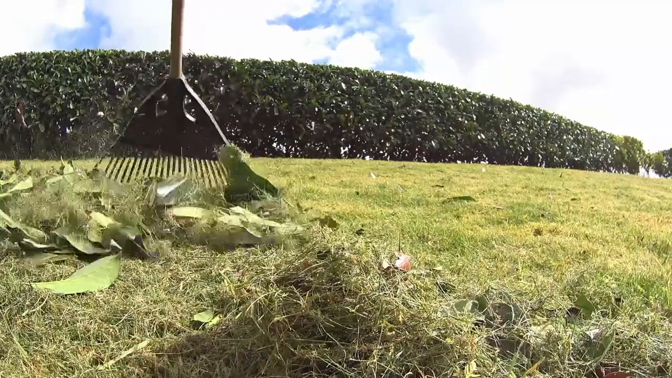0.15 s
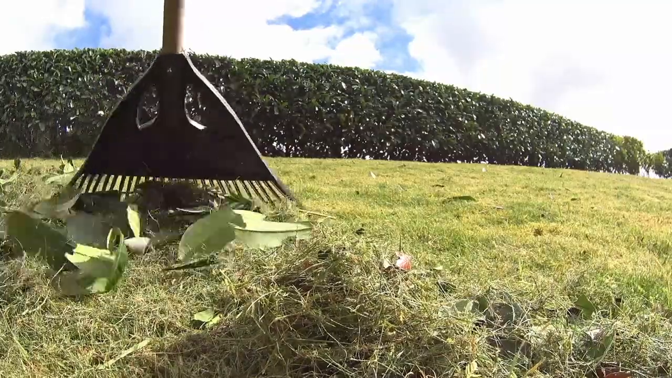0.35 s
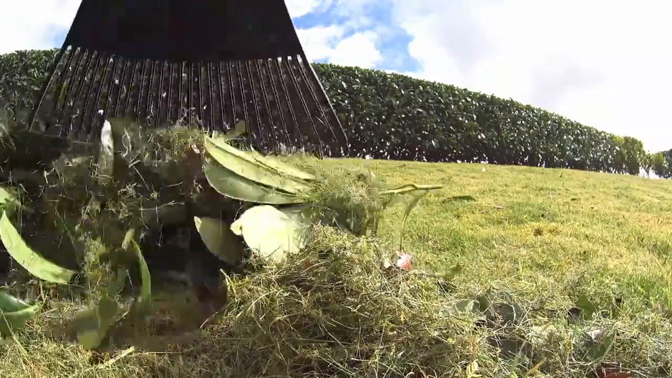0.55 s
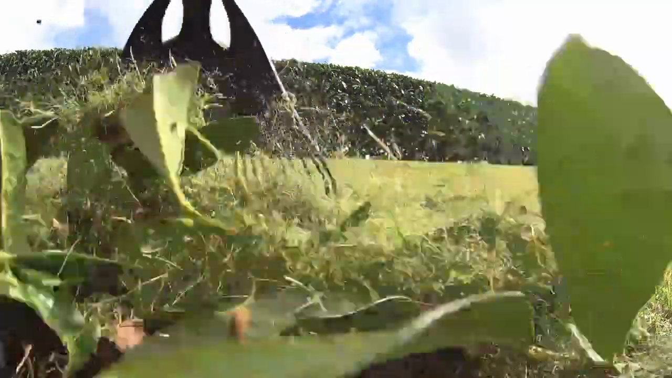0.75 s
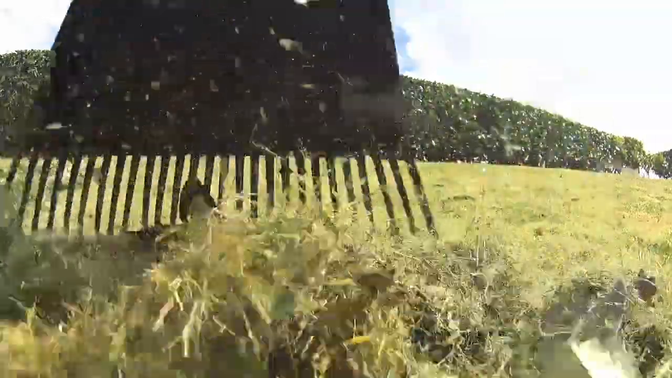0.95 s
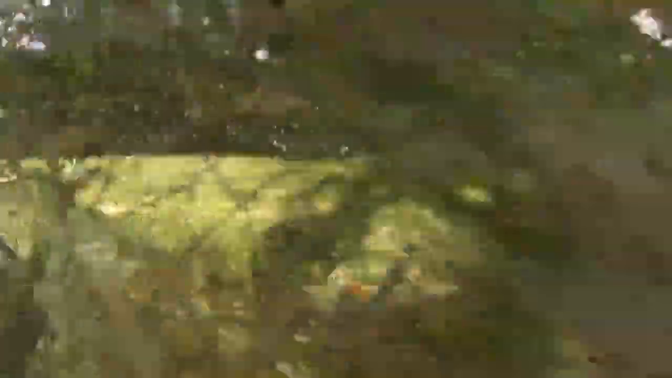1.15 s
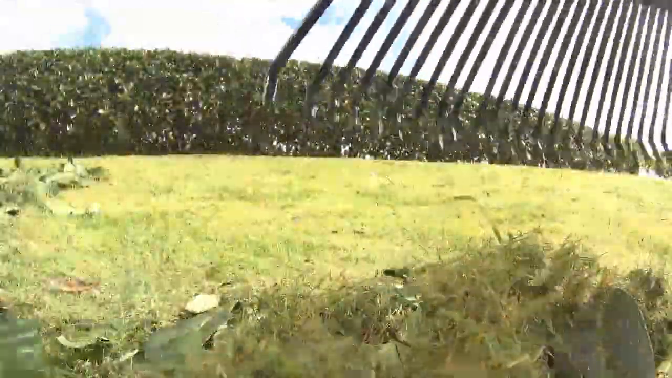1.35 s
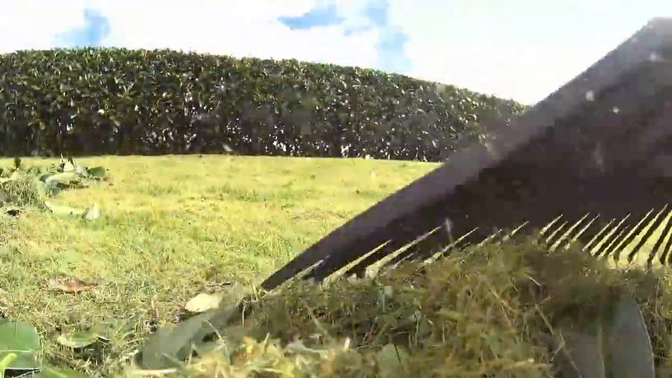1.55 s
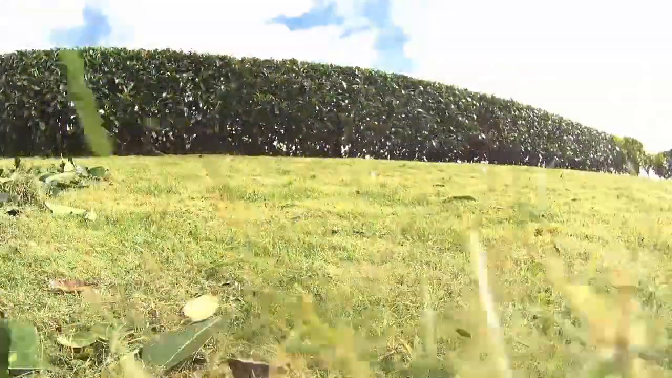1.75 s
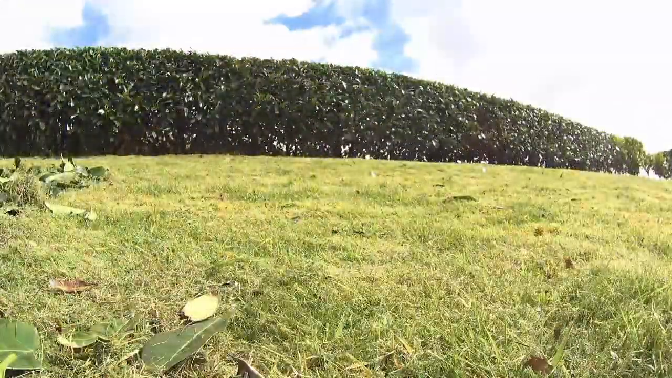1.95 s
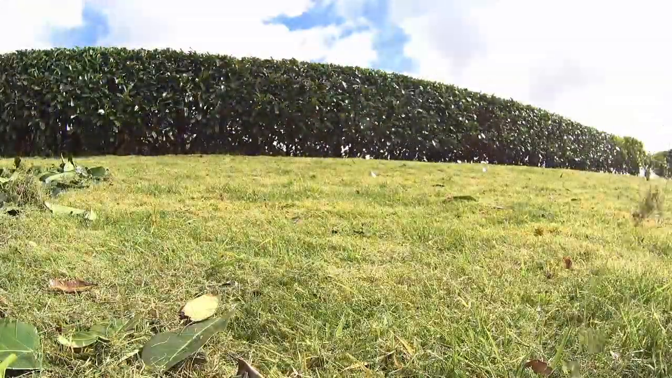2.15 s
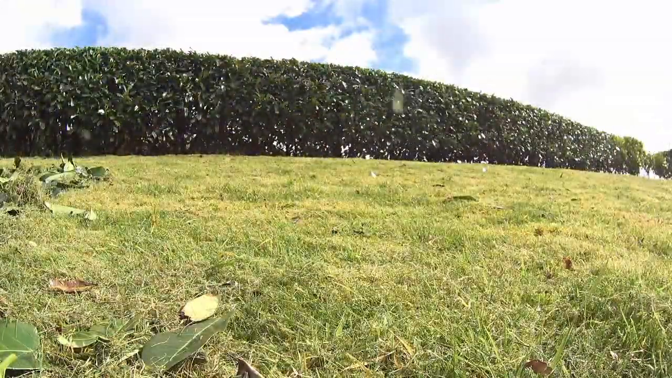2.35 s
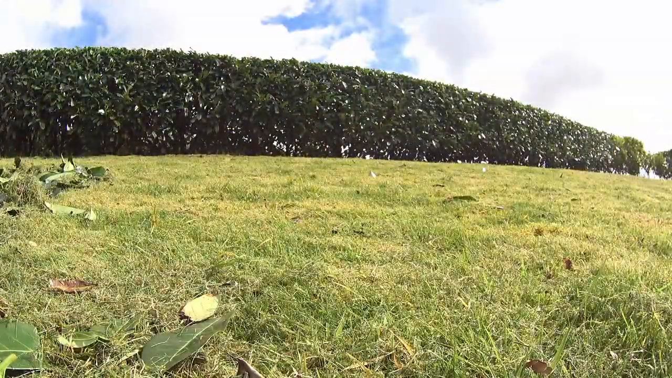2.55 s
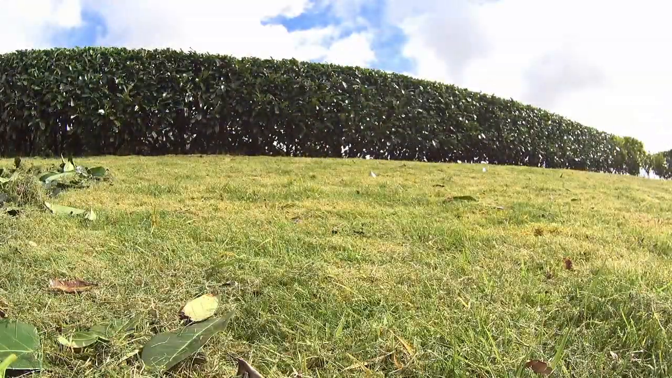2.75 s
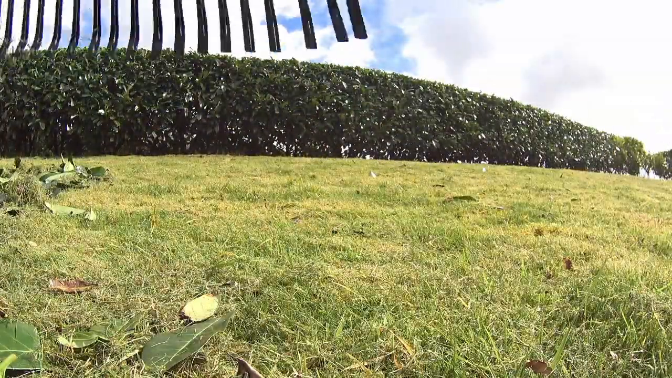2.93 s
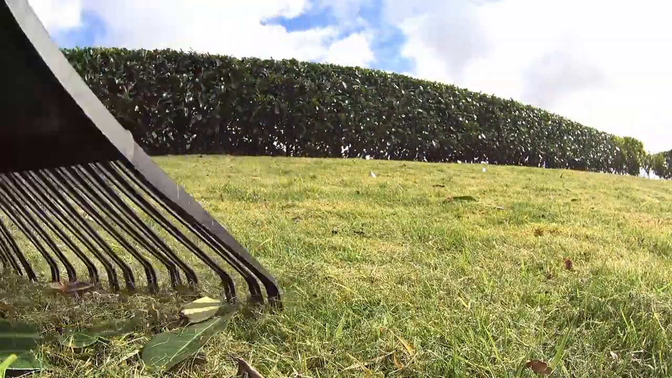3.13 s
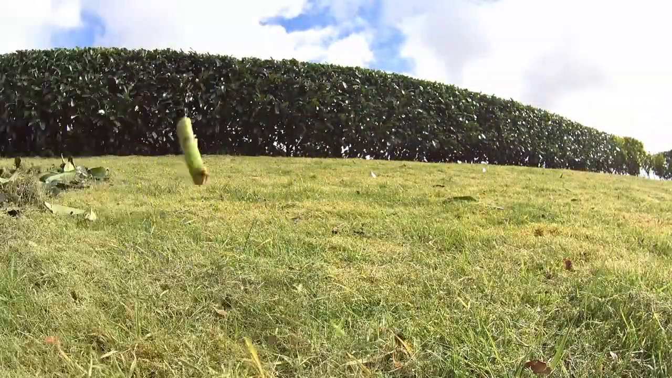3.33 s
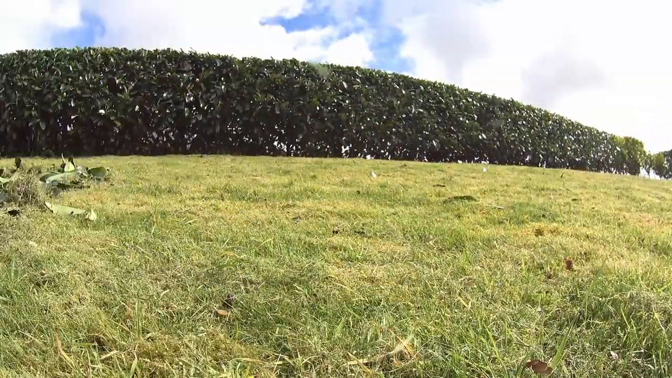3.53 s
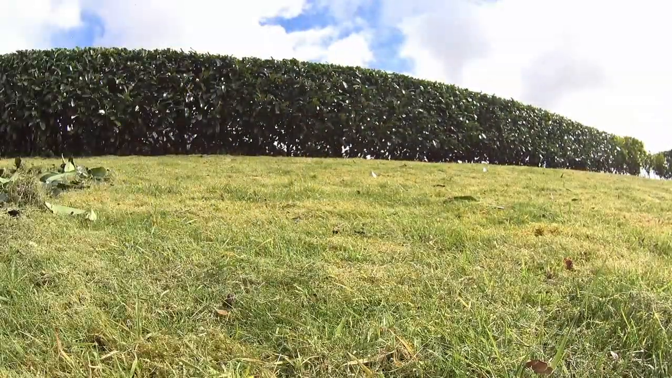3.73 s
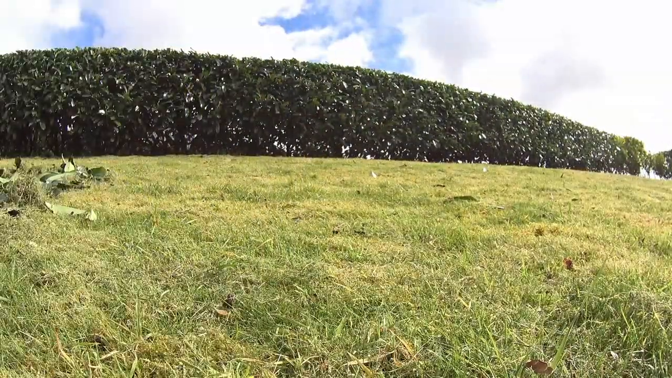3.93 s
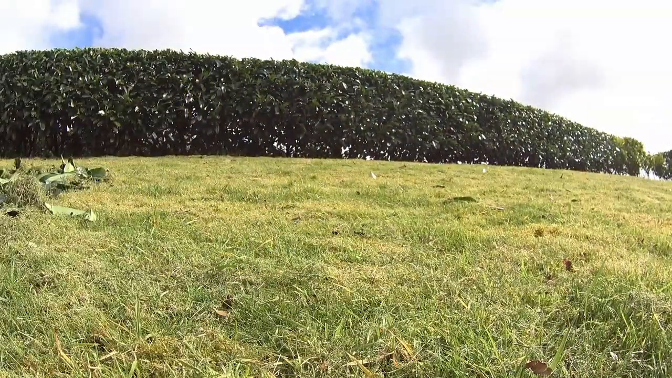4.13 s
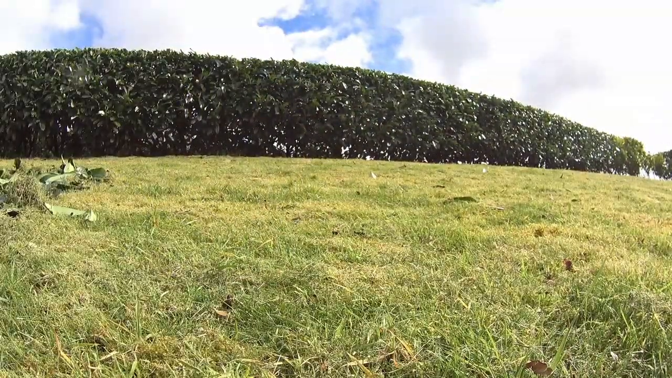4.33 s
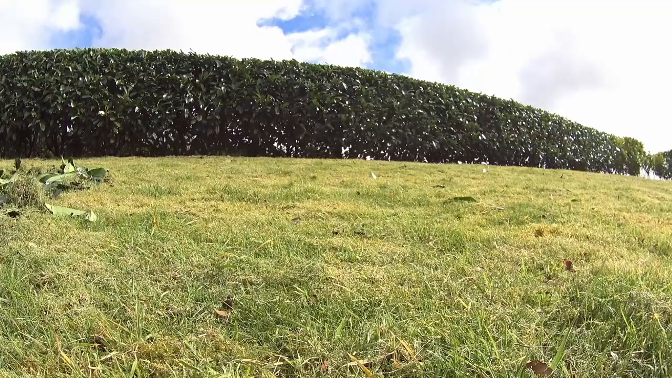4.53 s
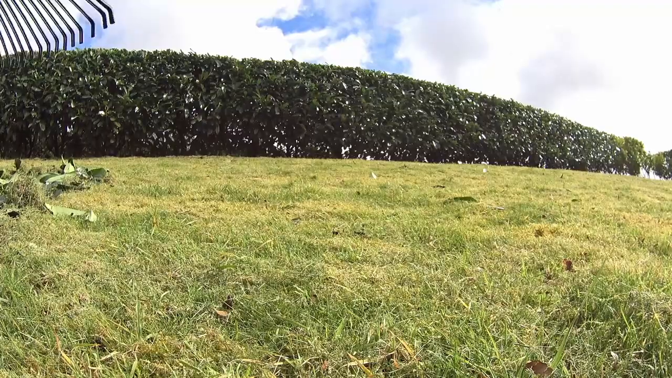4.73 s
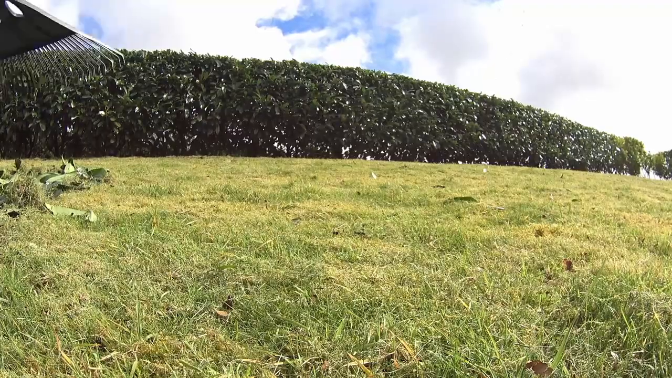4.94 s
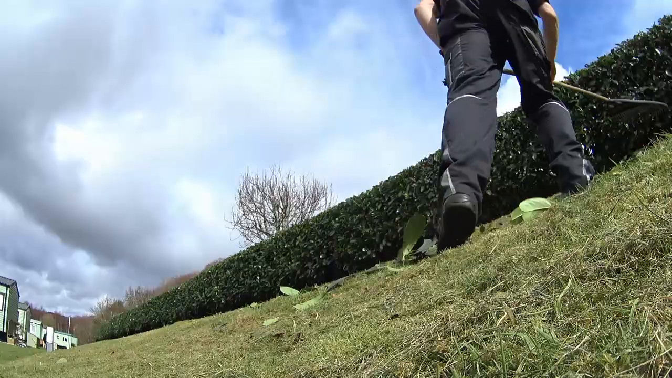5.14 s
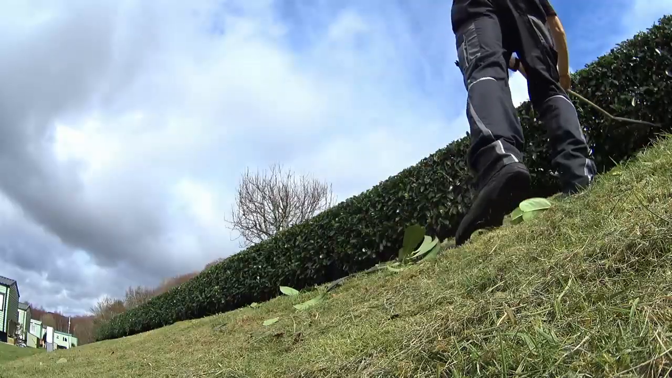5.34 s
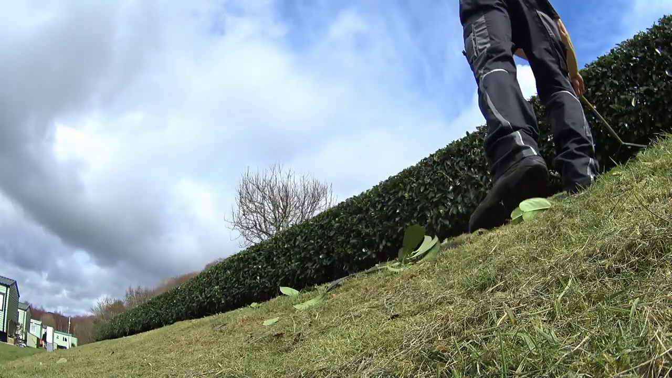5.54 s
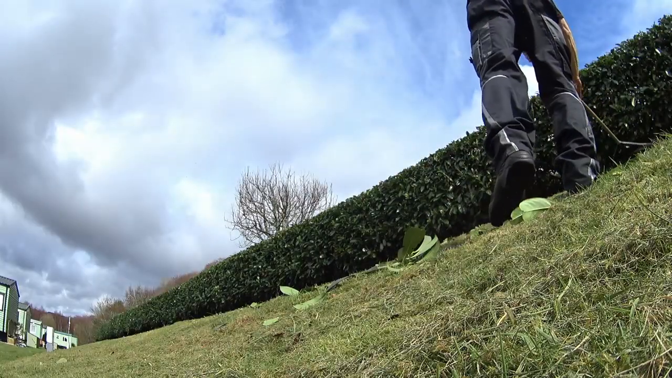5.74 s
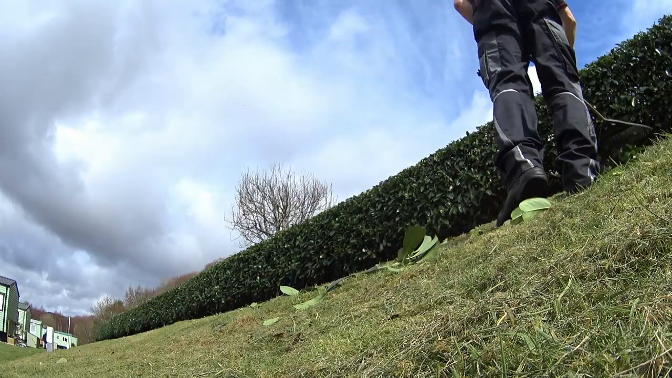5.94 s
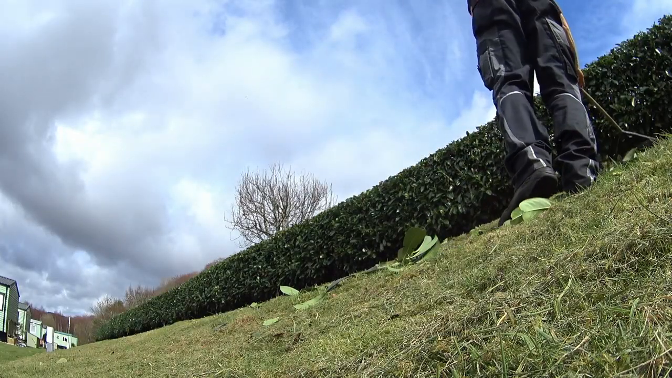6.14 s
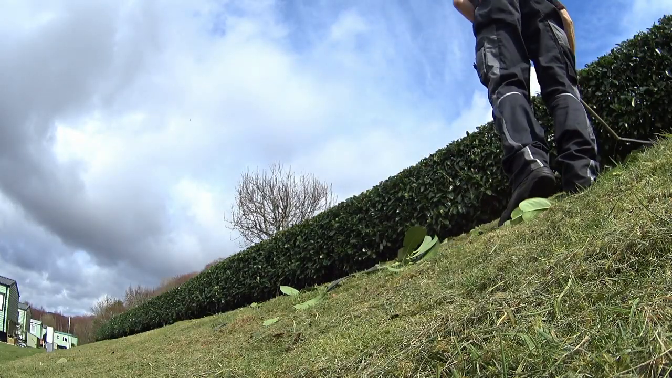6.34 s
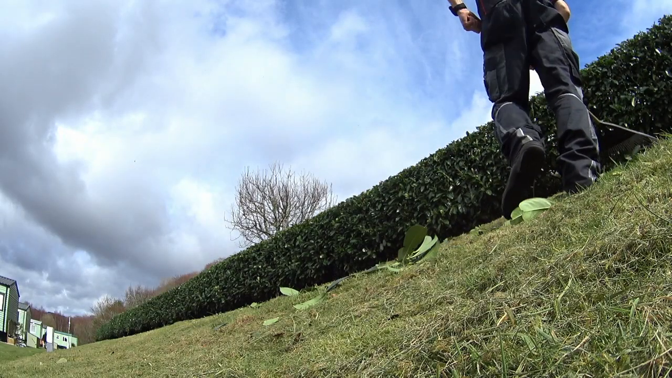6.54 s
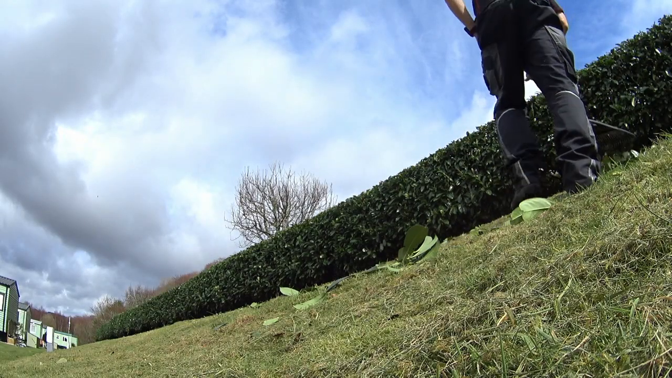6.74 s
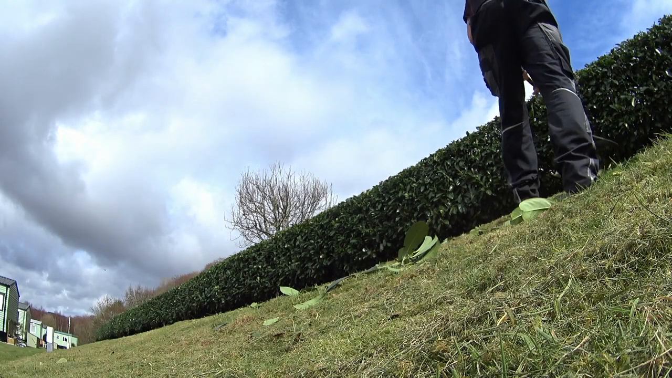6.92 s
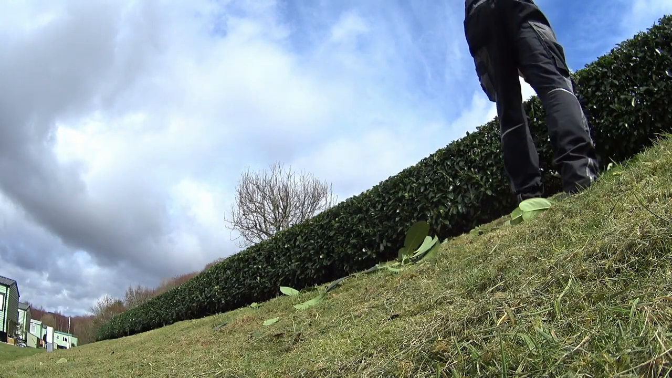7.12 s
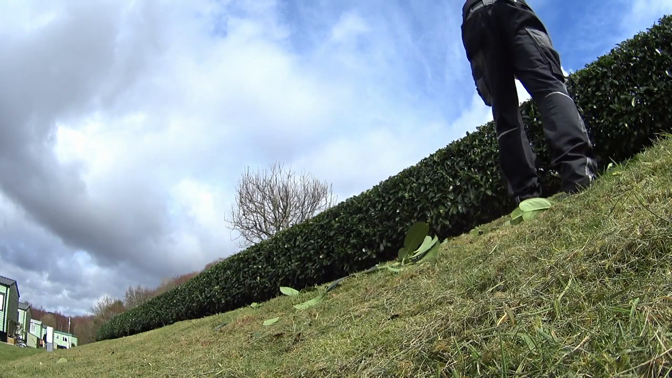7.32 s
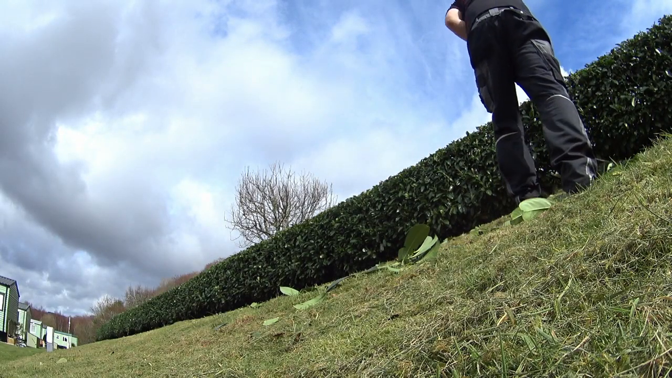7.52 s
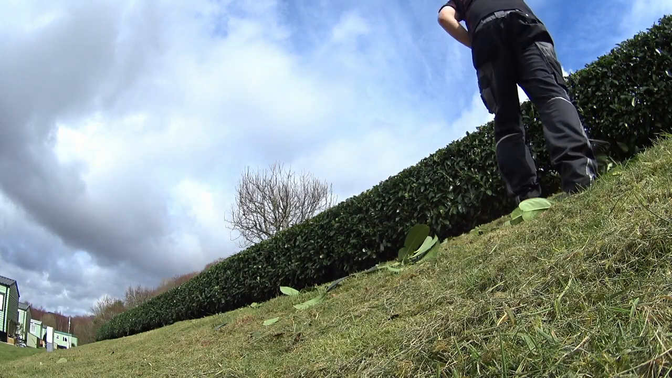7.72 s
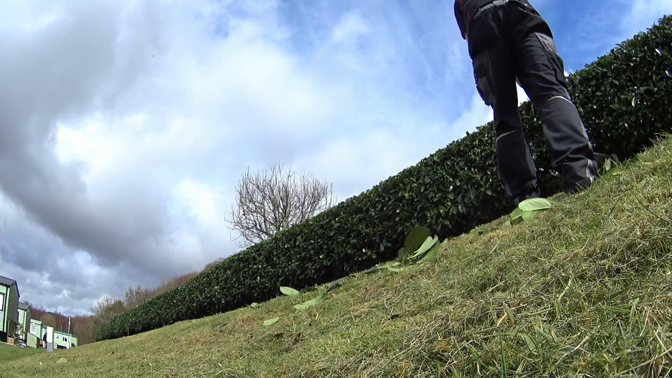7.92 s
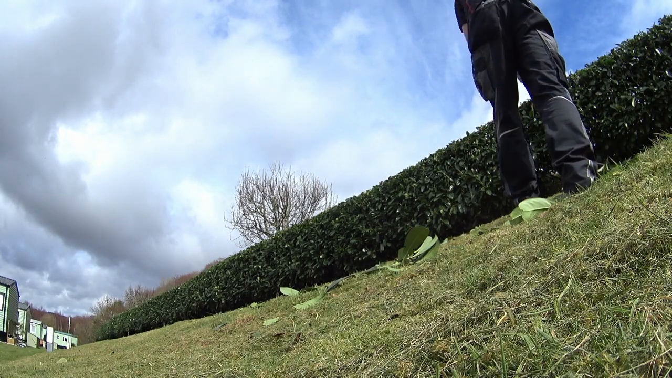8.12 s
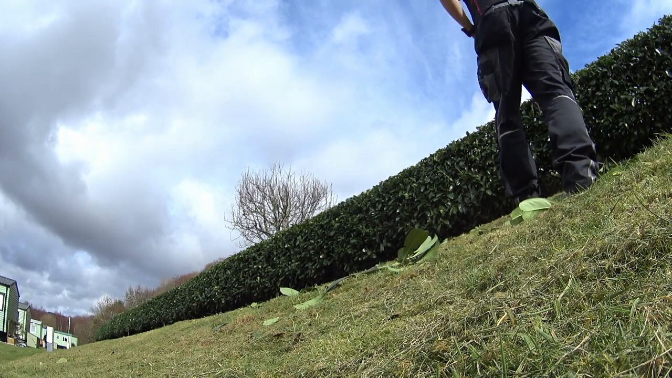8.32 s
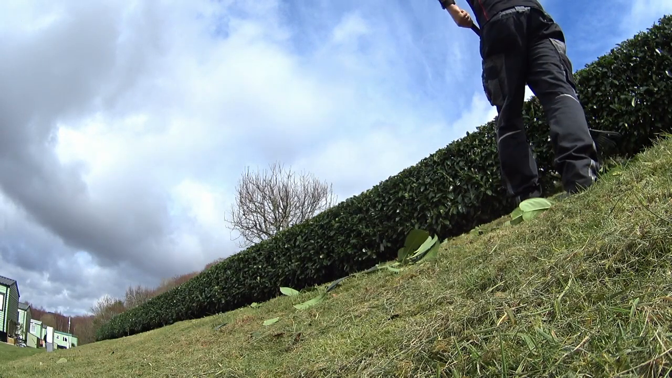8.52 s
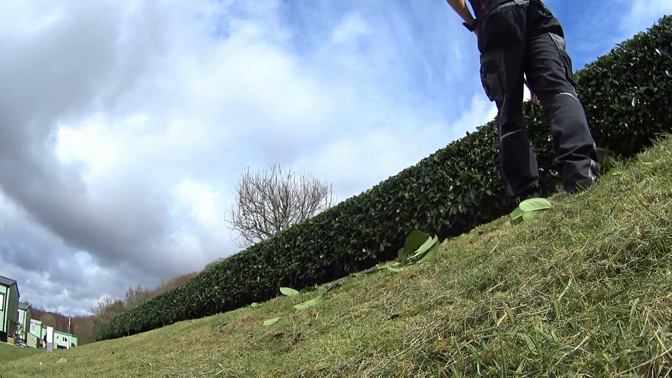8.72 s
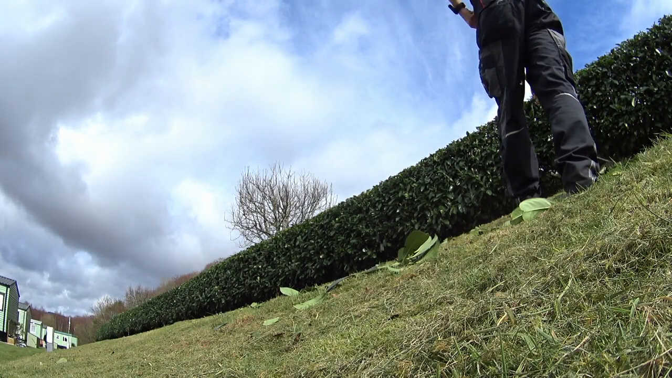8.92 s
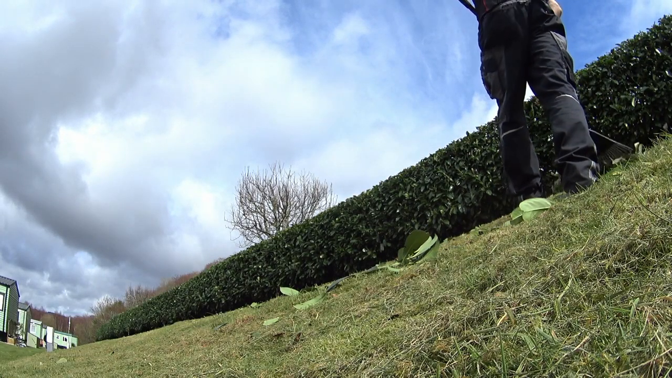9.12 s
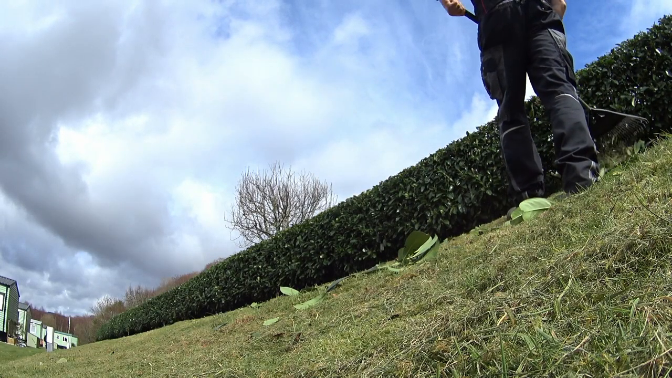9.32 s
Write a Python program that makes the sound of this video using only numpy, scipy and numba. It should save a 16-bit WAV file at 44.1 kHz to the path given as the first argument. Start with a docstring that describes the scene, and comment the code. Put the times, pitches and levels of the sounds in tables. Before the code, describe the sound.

A plastic rake works through hedge clippings beside a microphone on the lawn. From 0 s leaves rustle, swelling to crunchy strokes around 0.4-0.7 s while a bird buzzes twice. At 0.9-1.9 s strokes are loudest and dense, tines clattering, hollow knocks and thrown clippings drumming on the housing, with a hard blow near 1.2 s. A quieter gap from 2 s has light ticks, a small scrape at 2.3 s, a thin high bird note and buzzy calls near 3 s. Another violent sweep peaks at 3.3-3.5 s, one tine briefly ringing; a sharp overloaded knock follows at 4.07 s, then faint rustles. A weak low hum stops at 5.1 s as raking turns distant: soft swish-scrapes around 5.7, 6.4, 7.5, 8.3 and 9.1 s. Birds whistle until 6.3 s, then chip rapidly at 6.8-7.3 s with a diffuse outdoor tail. Passing hiss fades, gusts buffet near 7.8 s, over quiet outdoor hush.

```python
"""A rake drags through hedge clippings close by: clumped snaps and hiss rustle, ringing modes make the tines clatter
and knock, thrown clippings drum on the camera housing and filtered noise shakes the turf. Buzzing bird calls and a
thin high note, sliding sines, come over a wavering hum. Just past halfway the hum stops and the raking moves further
off, a soft swish and scrape with sparse knocks, under a passing hiss and gusts of wind. Birds whistle, then chip
quickly, with a tail from hedge and trees. Filtered noise lies beneath it all as a faint outdoor hush."""
import sys
import numpy as np
from scipy import signal
from scipy.fft import rfft, irfft
from scipy.io import wavfile
from scipy.ndimage import uniform_filter1d
from numba import njit

SR = 44100
rng = np.random.default_rng(int(sys.argv[2]) if len(sys.argv) > 2 else 0)


def pcm_store(signal):
    """Save signal as 16-bit PCM."""
    levels = np.round(np.clip(np.atleast_2d(signal), -1, 1) * 32767)
    wavfile.write(sys.argv[1], SR, levels.astype(np.int16).T)


N = 417627
MOVE_S = 5.14  # the near strokes end here and the raking is heard further off


# near strokes of the rake; levels before the trims in raking():
# (full strength at [s], rise [s], hold [s], fall [s], leaf rustle [dB], tine clatter [dB],
#  drumming on the housing [dB], turf rumble [dB], left minus right [dB])
STROKES = [(0.06, 0.33, 0.21, .08, -39.5, -57, -56.5, -75, 1),
           (0.28, .05, 0.128, .05, -36.5, -59, -42, -63, 1.5),
           (0.425, 0.033, .1, 0.11, -26.5, -43, -32.5, -50, 1.5),
           (0.58, 0.18, .13, 0.13, -36, -45, -48.5, -60, 1.5),
           (0.73, 0.055, 0.2, 0.12, -32.5, -41, -48.5, -63, 0.5),
           (0.94, 0.063, 0.086, 0.061, -27, -21, -27.5, -32, 2),
           (1.063, 0.06, 0.053, .05, -24, -25.5, -29, -40, 1),
           (1.13, .03, 0.074, 0.011, -30, -32, -38, -41, 0.5),
           (1.3, 0.091, 0.12, 0.021, -39.5, -27, -32.5, -45, 1.5),
           (1.42, .02, 0.16, 0.046, -42.5, -36, -38, -44.5, 0.5),
           (1.62, 0.027, 0.13, 0.061, -28.5, -31, -35.5, -51, -1.5),
           (1.73, 0.047, 0.05, 0.14, -20.5, -18, -25.5, -35, -1.5),
           (1.92, 0.064, 0.0085, 0.28, -37.5, -42, -50, -67, -2),
           (2.27, 0.034, 0.044, .05, -38, -46.5, -46, -50, -9),
           (2.34, .07, 0.035, 0.15, -31.5, -37, -38, -43, -9),
           (2.85, .3, .01, 0.22, -48.5, -49.5, -58, -66, -3.5),
           (3.168, 0.0046, 0.071, .05, -37, -44, -44.5, -53, 2),
           (3.24, .04, 0.083, .05, -27.5, -35.5, -38.5, -44.5, 5.5),
           (3.31, 0.086, 0.07, 0.033, -19.5, -23, -32, -55, 2),
           (3.405, 0.037, 0.018, 0.02, -30, -18, -22.5, -31, 2.5),
           (3.44, 0.034, 0.053, 0.014, -41.5, -37.5, -38.5, -29, 1),
           (3.6, 0.059, 0.16, 0.3, -54.5, -49, -60, -70, 0),
           (3.98, 0.044, 0.033, .03, -38, -45, -52, -58, 6),
           (4.03, 0.056, 0.029, 0.0078, -33, -40, -35.5, -51, 5.5),
           (4.08, 0.017, 0.0082, 0.03, -56, -24.5, -22, -29, 2),
           (4.121, 0.025, 0.034, 0.098, -44.5, -38, -34, -36.5, 2),
           (4.25, 0.081, 0.27, 0.033, -57.5, -54.5, -66, -70, 7.5),
           (4.67, 0.0088, 0.012, 0.016, -48.5, -48, -55, -63, -0.5),
           (4.84, 0.21, 0.014, 0.17, -43.5, -46, -49, -62, 9),
           (4.98, .05, .1, 0.14, -61, -58.5, -59, -62, 6.5)]


def raking():
    """Each near stroke swells four layers: leaves, tines, thrown clippings and shaken turf."""
    leaf, tine, thrown, shake = swells(*np.transpose(STROKES)[:-1])
    leaves = leaf * rustle(count=30000, spread_db=4.5, snap_db=1.5, clump_db=3.5)
    tines = tine * tine_clatter()
    drum = thrown * undb(3.5) * drumming()
    turf = shake * rumble()
    moving = (leaves + tines) * sides(side_of(np.arange(N) / SR))
    return (moving + drum + turf) * (np.arange(N) < MOVE_S * SR)


def side_of(s):
    """Where the rake is at times s, as left minus right dB, sliding from stroke to stroke."""
    strokes = np.array(STROKES)
    return np.interp(s, strokes[:, 0], strokes[:, -1])


# colour of leaf and stalk: (frequency [Hz], relative density [dB per Hz])
LEAF_COLOUR = [(710, -9), (1200, -8), (1750, -7), (2610, -4), (2840, -2.5), (3560, -3), (4680, -2),
               (7100, -10.5), (8740, -10.5), (11100, -14), (11500, -48.5), (15000, -59.5), (22000, -120)]


def rustle(count, spread_db, snap_db, clump_db):
    """Thousands of tiny snaps of leaf and stalk, coming in clumps, over the hiss of grass through the tines."""
    when, loud, sign, place = rng.random((count, 4)).T
    size = undb(np.minimum(-spread_db * np.log(loud), 15)) * np.sign(sign - .5)
    aside = place - .5
    snaps = np.zeros((2, N))
    np.add.at(snaps, (slice(None), (when * N).astype(int)), size * np.array([1 + aside, 1 - aside]))
    clumped = level(snaps * undb(clump_db * walk(60)), snap_db)
    hiss = undb(1.3 * walk(20)) * wide(0.61)
    return level(colour(clumped + level(hiss, 0), LEAF_COLOUR), 0)


# ringing modes of the plastic tines: (pitch [Hz], relative level [dB], t60 before damping [s])
TINE_MODES = [(933, 4, 0.033), (1275, -2, 0.055), (1690, -0.5, .03), (2252, -5.5, 0.029),
              (3170, -15, 0.068)]


def tine_clatter():
    """Many small blows ring the tine modes, with a restless level."""
    blows = clatter(TINE_MODES, count=9000, spread_db=2.5, detune=0.093, damp=0.63, scatter=1.0)
    return undb(2.84 * walk(50)) * blows


# ringing modes of the camera housing: (pitch [Hz], relative level [dB], t60 before damping [s])
HOUSING_MODES = [(228, -10.5, 0.071), (280.3, 0, 0.06), (421, 3.5, 0.032), (540, -6, 0.051),
                 (687, -2.5, 0.046)]


def drumming():
    """Thrown clippings strike the housing and ring its low modes."""
    return clatter(HOUSING_MODES, count=4000, spread_db=3.0, detune=0.16, damp=0.79, scatter=1.0)


def rumble():
    """Low shaking of the turf, noise nearly alike left and right."""
    shake = undb(2.9 * walk(16)) * wide(0.34)
    return level(colour(shake, [(15, -62), (40, -17), (70, -10.5), (105, 9.5), (150, -8), (260, -50.0)]), 0)


# single knocks and snaps; levels before the trims in knocks():
# (time [s], peak [dB], main pitch [Hz], crack [dB], housing thud [dB])
KNOCKS = [(0.417, -20.5, 2800, -14.5, -38), (0.442, -21, 3860, -22, -43), (0.471, -16, 3850, -27, -28.5),
          (0.534, -10, 1220, -16, -31), (0.946, -13, 1290, -24, -26), (1.002, -10, 1290, -39, -21),
          (1.064, -17, 1250, -15.5, -25.5), (1.156, -27, 914, -28, -37), (1.209, -4.5, 3000, -21, -41),
          (1.216, -1.5, 1010, -31, -11), (1.255, -14, 1440, -34, -35), (1.307, -16, 1260, -25, -31),
          (1.344, -10, 1340, -28, -28), (1.345, -12.5, 3320, -35, -40), (1.391, -15, 1010, -19, -25),
          (1.399, -10, 1000, -20.5, -31), (1.534, -26, 974, -54, -35), (1.603, -13.5, 1270, -47, -27),
          (1.86, -18.5, 1280, -45, -33), (2.308, -38, 3040, -20, -45), (2.354, -17, 3550, -18.5, -36.5),
          (2.429, -22, 1440, -32, -36.5), (2.923, -36, 910, -49, -46), (2.992, -32, 940, -62.5, -45),
          (3.179, -30, 1060, -28, -49), (3.226, -20.5, 1250, -23, -48), (3.259, -15, 1510, -15, -44),
          (3.272, -21, 1490, -24, -51), (3.363, -17, 945, -41, -41), (3.408, -11, 1700, -36, -25),
          (3.424, -14, 910, -43, -19.5), (3.436, -21, 600, -48, -22), (3.465, -20, 945, -46, -47),
          (3.497, -11.5, 1090, -38, -31), (3.501, -4.5, 2680, -34, -30), (3.51, -0.5, 720, -18, -15.5),
          (3.611, -29, 1270, -24, -60), (3.82, -14, 906, -39, -21.5), (3.887, -40, 920, -52, -47),
          (4.065, 4.5, 786, -20.5, -16), (4.084, -6, 970, -37, -16), (4.093, -9, 805, -34, -18.5),
          (4.117, -18, 595, -32, -31), (4.284, -26.5, 630, -33.5, -59), (4.477, -34.5, 1330, -39.5, -61),
          (4.666, -27.5, 2580, -39.5, -48.5), (4.816, -37, 2470, -29.5, -59), (6.58, -54, 1180, -46, -49.5),
          (7.653, -42, 1140, -43.5, -61), (8.515, -35, 2000, -39, -57), (9.199, -33.5, 1700, -34, -56)]
HARD_DB, CHOKE_PER_DB = -12.5, 0.1  # each dB of peak above HARD_DB shortens the ring by this share


def knocks():
    """Each blow rings a short tone of its own and the tine modes near it, thuds the housing and cracks."""
    s, peak_db, hz, crack_db, thud_db = np.transpose(KNOCKS)
    long = np.maximum(1 - CHOKE_PER_DB * np.maximum(peak_db - HARD_DB, 0), .3)
    pan_db = np.where(s < MOVE_S, side_of(s), -4)
    soft = np.clip((peak_db - crack_db) / 25, .15, 1.2)  # a blow with little crack has a longer contact

    def vary():
        return rng.standard_normal(len(s))

    out = strike(s, hz, 0.022 * long, undb(peak_db - 0.5), pan_db, .5 * vary(), 0.14 * soft)
    out += cracks(s, crack_db + 5.5, pan_db)
    for mode_hz, db, t60 in TINE_MODES:
        near_db = db - 7.0 - 6 * np.abs(np.log2(mode_hz / hz))  # 6 dB weaker per octave from the main pitch
        tuned_hz = mode_hz * (1 + 0.026 * vary())
        out += strike(s, tuned_hz, t60 * long, undb(peak_db + near_db), pan_db, 1.84 * vary(), 0.6 * soft)
    for mode_hz, db, t60 in HOUSING_MODES:
        tuned_hz = mode_hz * (1 + 0.042 * vary())
        out += strike(s, tuned_hz, t60 * long, undb(thud_db + db + 5), pan_db, 1.66 * vary(), 0.36 * soft)
    return out


# the tine that keeps singing: (time [s], pitch [Hz], level [dB], t60 [s])
AFTER_RING = (3.514, 1980, -38, .12)


def after_ring():
    """One tine keeps singing, a single mode that decays slowly."""
    s, hz, db, t60 = np.array(AFTER_RING)[:, None]
    return strike(s, hz, t60, undb(db), 0 * s, 0 * s, 3.0)


# loose stalks and twigs dropping; level before the trims in ticks(): (time [s], peak [dB], pitch [Hz])
TICKS = [(2.081, -26.5, 1050), (2.1, -27, 7090), (2.149, -30, 8020), (2.202, -35, 903), (2.337, -17, 5000),
         (2.484, -25, 3600), (2.509, -35, 710), (2.548, -30, 7470), (2.733, -31.5, 2030), (2.84, -29, 820),
         (3.082, -40, 875), (3.603, -26, 1260), (3.656, -30, 1350), (3.701, -34, 1380), (4.138, -23, 920),
         (4.214, -26, 1280), (4.391, -35, 2130), (4.619, -30, 1000), (4.632, -39, 953), (1.292, -17, 3370),
         (0.473, -15, 6500), (1.017, -21, 8000), (1.08, -15, 6000), (2.002, -30, 902), (8.558, -33, 4000),
         (8.135, -46, 4500), (6.44, -42, 4000)]


def ticks():
    """A light click and a brief tone for each dropping stalk."""
    s, peak_db, hz = np.transpose(TICKS)
    tone = strike(s, hz, 0.017 + 0 * s, undb(peak_db - 9.5), 0 * s, 0 * s, 0.24)
    return tone + cracks(s, peak_db - 8.5, 0 * s)


# colour of the snap of a hard contact: (frequency [Hz], relative density [dB per Hz])
CRACK_COLOUR = [(900, -13), (2000, 0.5), (3200, 3.5), (5000, 0), (7200, -11), (11000, -15)]


def cracks(s, db, pan_db):
    """Short wide snaps: a click with a few milliseconds of splintering noise."""
    t = np.arange(300) / SR
    out = np.zeros((2, N))
    for at, gains in zip((s * SR).astype(int), (undb(db) * sides(pan_db)).T):
        splinter = rng.standard_normal(len(t)) * undb(-60 * t / 0.013)
        out[:, at:at + len(t)] += gains[:, None] * (splinter + 3.4 * (t == 0))
    return colour(out, CRACK_COLOUR)


# strokes further along the hedge; rustle before the trim in far_raking():
# (full strength at [s], rise [s], hold [s], fall [s], leaf rustle [dB], scrape [dB])
FAR_STROKES = [(5.16, 0.059, 0.45, 0.22, -62.5, -61), (5.72, .06, 0.17, .3, -58, -54.5),
               (6.38, 0.28, 0.24, .15, -57.5, -52.5), (6.747, .2, 0.29, 0.22, -69.5, -71),
               (7.237, 0.07, 0.035, .05, -66.5, -58), (7.472, .2, 0.091, 0.31, -56, -54),
               (8.137, 0.066, 0.061, .1, -64.5, -61), (8.287, .1, 0.24, 0.18, -58, -53),
               (9.055, 0.14, 0.093, 0.23, -53.5, -49)]


def far_raking():
    """Raking further off, its grains merged to a soft swish and a low noise scrape."""
    leaf, drag = swells(*np.transpose(FAR_STROKES))
    swish = rustle(count=30000, spread_db=3.5, snap_db=-2.5, clump_db=4.0) * sides(-3.5)[:, None]
    scrape = undb(2.7 * walk(25)) * wide(0.39)
    scrape = colour(scrape, [(80, -37), (200, -6), (340, 1.5), (520, -4), (900, -37.0)])
    return (leaf * undb(3.0) * swish + drag * level(scrape, 0)) * (np.arange(N) >= MOVE_S * SR)


def birds():
    """Buzzing calls, a thin high note and whistles to the left; quick chips from further away."""
    return garden(buzzes() + seep() + whistles(), -12) + garden(chips(), 1.5)


# buzzing calls; level before fade and pan:
# (start [s], length [s], first pitch [Hz], settled pitch [Hz], glide [s], level [dB])
BUZZES = [(0.04, 0.077, 3850, 3990, 0.034, -38), (0.234, 0.072, 3710, 3900, .02, -37),
          (2.747, 0.08, 3600, 3950, 0.0228, -44), (2.94, 0.078, 3500, 3880, 0.021, -46),
          (3.018, .04, 3680, 3800, .03, -56)]


def buzzes():
    """A fast deep wobble of pitch turns each note into a buzz."""
    return sum(note(row, attack_s=0.02, fade_db=5., trill_hz=225., depth_hz=200., pan_db=13.) for row in BUZZES)


# thin high note; level before fade and pan:
# (start [s], length [s], first pitch [Hz], settled pitch [Hz], glide [s], level [dB])
SEEP = [(2.49, 0.1455, 7300, 7700, .09, -54)]


def seep():
    """A high note that rises in pitch, wobbles fast and comes in slowly."""
    return sum(note(row, attack_s=0.052, fade_db=10.2, trill_hz=247.2, depth_hz=150., pan_db=12.) for row in SEEP)


# whistles; level before fade and pan:
# (start [s], length [s], first pitch [Hz], settled pitch [Hz], glide [s], level [dB])
WHISTLES = [(5.14, 0.038, 4070, 3900, .011, -42), (5.38, 0.069, 4180, 4060, 0.018, -48),
            (5.535, 0.053, 4140, 4050, 0.022, -41.5), (5.585, 0.053, 4040, 4140, 0.034, -42.5),
            (5.675, 0.088, 3570, 3540, 0.043, -42), (5.815, 0.033, 3740, 3730, .012, -38.5),
            (5.885, 0.141, 3780, 3750, 0.084, -46.5), (6.07, .215, 3590, 3730, 0.12, -62),
            (6.1, .06, 4260, 4340, .03, -70), (6.165, .135, 4420, 4200, 0.13, -65)]


def whistles():
    """Nearly pure notes with a shallow wobble of pitch."""
    return sum(note(row, attack_s=0.0135, fade_db=3.2, trill_hz=43.5, depth_hz=24., pan_db=6.7) for row in WHISTLES)


# quick chips; level before fade:
# (start [s], length [s], first pitch [Hz], settled pitch [Hz], glide [s], level [dB])
CHIPS = [(6.791, 0.04, 6400, 5450, 0.02, -60.5), (6.824, .013, 5900, 5050, .009, -60),
         (6.89, 0.035, 6300, 5440, 0.019, -55), (6.921, .014, 5970, 5100, .009, -55),
         (6.99, 0.022, 4550, 3670, .011, -54), (7.008, 0.026, 3660, 3850, .008, -51.5),
         (7.097, .016, 3970, 3400, 0.0099, -55), (7.11, 0.032, 3500, 4730, .024, -54.5),
         (7.188, 0.039, 4900, 3590, 0.015, -54), (7.288, 0.056, 4450, 3340, 0.0092, -56)]


def chips():
    """Very short notes with fast slides of pitch."""
    return sum(note(row, attack_s=0.005, fade_db=1.5, trill_hz=60., depth_hz=40., pan_db=0.) for row in CHIPS)


def note(row, attack_s, fade_db, trill_hz, depth_hz, pan_db):
    """A near-sine whistle that slides to its pitch and fades, its pitch wobbling by depth_hz."""
    s, length, first_hz, hz, glide_s, db = row
    t = np.arange(int(length * SR)) / SR
    slide = (first_hz - hz) * np.exp(-(t / glide_s) ** 4)
    pitch = hz + slide + depth_hz * np.sin(2 * np.pi * trill_hz * t)
    edge = np.clip(np.minimum(t / attack_s, (length - t) / 0.0043), 0, 1)
    tone = np.sin(2 * np.pi * np.cumsum(pitch) / SR)
    out = np.zeros(N)
    out[int(s * SR):int(s * SR) + len(t)] = edge * undb(db - fade_db * t / length) * tone
    return np.sqrt(2) * out * sides(pan_db)[:, None]


def garden(song, wet_db):
    """The song with a scattered tail from hedge and trees, a decaying noise response."""
    t60_s, onset_s = .5, 0.016
    t = np.arange(SR // 2) / SR
    tail = rng.standard_normal((2, len(t))) * undb(-60 * t / t60_s) * np.minimum(t / onset_s, 1)
    wet = signal.fftconvolve(song, tail / np.sqrt(np.sum(tail[0] ** 2)), axes=1)[:, :N]
    return song + undb(wet_db) * wet


# passing hiss: (time [s], level [dB])
PASSING = [(5.14, -55), (5.8, -53.5), (7.6, -58.5), (8.85, -65.5), (9.47, -65)]


def passing_hiss():
    """A band of noise around the low treble that comes and goes."""
    s, db = np.transpose(PASSING)
    hiss = undb(1.0 * walk(7.4)) * wide(0.77)
    hiss = colour(hiss, [(400, -33.0), (800, -4.5), (1250, 3.5), (1700, 0.5), (2300, -15), (4000, -52)])
    gain = undb(np.interp(np.arange(N) / SR, s, db))
    return gain * level(hiss, 0) * (np.arange(N) >= MOVE_S * SR)


# gusts: (full strength at [s], rise [s], hold [s], fall [s], level [dB])
GUSTS = [(5.3, .4, 0.58, 1.5, -62.5), (7.66, .05, .1, 0.11, -56.5), (7.827, .05, 0.063, .15, -53.5),
         (8.948, .1, .05, 0.73, -65.5)]


def wind():
    """Wind on the microphone ports: deep unsteady noise, almost alike left and right."""
    gust, = swells(*np.transpose(GUSTS))
    buffet = undb(4.6 * walk(9)) * wide(0.069)
    buffet = colour(buffet, [(12, -19), (30, -9), (55, 5.0), (100, -4.0), (200, -33.5)])
    return gust * level(buffet, 0) * (np.arange(N) >= MOVE_S * SR)


def hum():
    """A low sine that wavers in pitch and level and stops just past halfway."""
    centre_hz, centre_db, end_s = 109, -67.5, 5.13
    tone = np.sin(2 * np.pi * np.cumsum(centre_hz + 2.1 * walk(12)) / SR)
    return np.sqrt(2) * tone * undb(centre_db + 2.74 * walk(18)) * (np.arange(N) < end_s * SR)


# colour of the outdoor hush: (frequency [Hz], relative density [dB per Hz])
HUSH_COLOUR = [(18, -33), (30, -6), (65, -5.5), (151, -1.5), (353, 0), (782, -5.5), (1220, -7.5),
               (2580, -13), (4360, -14.5), (6330, -15.5), (7350, -30.5), (10700, -32), (11500, -32),
               (15000, -71.5), (22000, -120)]
HUSH_DB = -55.5  # mean level


def hush():
    """Far-off outdoor noise with a slow drift in level."""
    drift = undb(1.5 * walk(3))
    return level(colour(drift * wide(0.7), HUSH_COLOUR), HUSH_DB)


def clatter(modes, count, spread_db, detune, damp, scatter):
    """A random stream of small blows, each on one mode; a few are much harder than the rest."""
    when, which, loud = rng.random((count, 3)).T
    tune, pan, phase, sign = rng.standard_normal((count, 4)).T
    hz, db, t60 = np.array(modes)[(which * len(modes)).astype(int)].T
    size = undb(db + np.minimum(-spread_db * np.log(loud), 15)) * np.sign(sign)
    blows = strike(when * N / SR, hz * np.exp(detune * tune), damp * t60, size, 3 * pan, scatter * phase, 0.23)
    return level(blows, 0)


# phase between the microphones: (frequency [Hz], lead of the left one [rad])
PORTS = [(60, .2), (250, 1.1), (560, 2.38), (1000, 5.08), (1400, 7), (3000, 6.6)]


def strike(s, hz, t60, size, pan_db, scatter, turns):
    """Rings at times s whose contact lasts some turns; the housing shifts their phase between its ports."""
    pole = np.exp(2j * np.pi * hz / SR - np.log(1000) / (np.abs(t60) * SR))
    port_hz, lead = np.transpose(PORTS)
    lag = scatter * np.minimum(hz / 450, 1) - np.interp(np.log(hz), np.log(port_hz), lead)
    left, right = size * sides(pan_db)
    start = (s * SR).astype(np.int64)
    push = np.exp(-hz / SR / turns)
    return ring(N, start, pole, push, left * np.exp(-.5j * lag), right * np.exp(.5j * lag))


@njit
def ring(length, start, pole, push, left, right):
    """Each grain swells over its contact time and rings out, with its own size and phase at the two microphones."""
    out = np.zeros((2, length))
    for k in range(len(start)):
        z, rest, i = 1 + 0j, 1., start[k]
        while i < length and z.real ** 2 + z.imag ** 2 > 3e-5:
            out[0, i] += (1 - rest) * (left[k] * z).imag
            out[1, i] += (1 - rest) * (right[k] * z).imag
            z, rest, i = z * pole[k], rest * push[k], i + 1
    return out


def swells(s, rise_s, hold_s, fall_s, *columns_db):
    """Each row rises, holds and falls along straight dB slopes; overlapping rows add their power."""
    slope_db = 20  # change over one rise or fall time
    t = np.arange(0, N + 32, 32) / SR
    before = (s[:, None] - t) / rise_s[:, None]
    after = (t - (s + hold_s)[:, None]) / fall_s[:, None]
    power = undb(-2 * slope_db * np.clip(np.maximum(before, after), 0, 6))
    return [np.interp(np.arange(N) / SR, t, np.sqrt(undb(2 * db) @ power)) for db in columns_db]


def colour(x, points):
    """Causal filter through (Hz, dB) points, from the cepstrum of the log gain."""
    hz, db = np.transpose(points)
    log_hz = np.log(np.arange(2049) * SR / 4096 + 1)
    cep = irfft(np.interp(log_hz, np.log(hz), db) * np.log(10) / 20)
    cep[1:2048] *= 2  # folding the cepstrum forward makes the filter minimum phase
    cep[2049:] = 0
    impulse = irfft(np.exp(rfft(cep)))[None, :1024]
    return signal.oaconvolve(x, impulse, axes=1)[:, :N]


def walk(rate):
    """Random levels held 1 / rate s and slewed twice; spread near 1."""
    k = int(SR / rate)
    steps = np.repeat(rng.standard_normal(N // k + 1), k)
    return 1.49 * uniform_filter1d(uniform_filter1d(steps, k), k)[:N]


def wide(share):
    """Noise on both microphones; share = strength of the unlike part."""
    mid, side = rng.standard_normal((2, N))
    return mid + share * side * np.array([[1], [-1]])


def undb(db):
    """Gain of a level in dB."""
    return 10 ** (np.asarray(db) / 20)


def level(x, db):
    """The signal scaled to an rms level in dB."""
    return x * undb(db) / np.sqrt(np.mean(x ** 2))


def sides(pan_db):
    """Left and right gains from left minus right dB."""
    return undb(np.array([pan_db, -pan_db]) / 2)


def scene():
    """All sources, from the rake to the background."""
    near = raking() + knocks() + after_ring() + ticks()
    return near + far_raking() + birds() + passing_hiss() + wind() + hum() + hush()


def record(dry):
    """Drops the deepest bass, clips the peaks that exceed full scale and cuts the top."""
    bass_cut_hz, top_hz = 38, 11150
    thin = signal.sosfilt(signal.butter(2, bass_cut_hz, "high", fs=SR, output="sos"), dry)
    return signal.sosfilt(signal.ellip(10, .2, 60, top_hz, fs=SR, output="sos"), np.clip(thin, -1, 1))


dry = scene()
out = record(dry)
pcm_store(out)
```